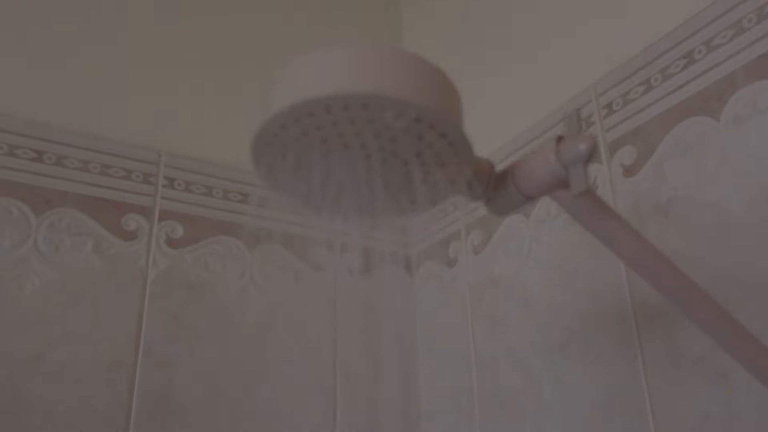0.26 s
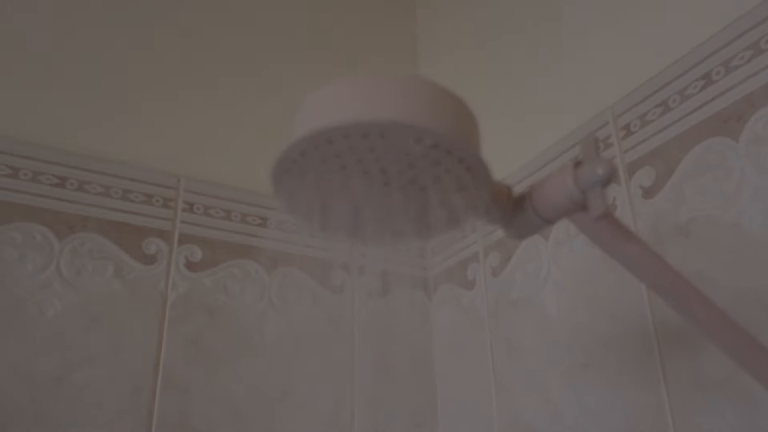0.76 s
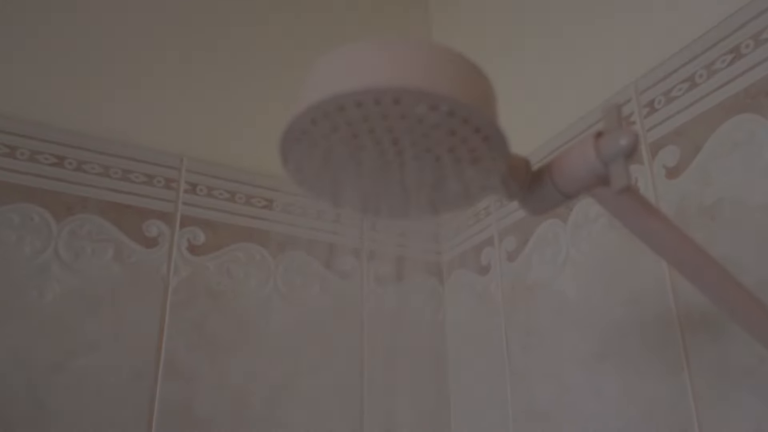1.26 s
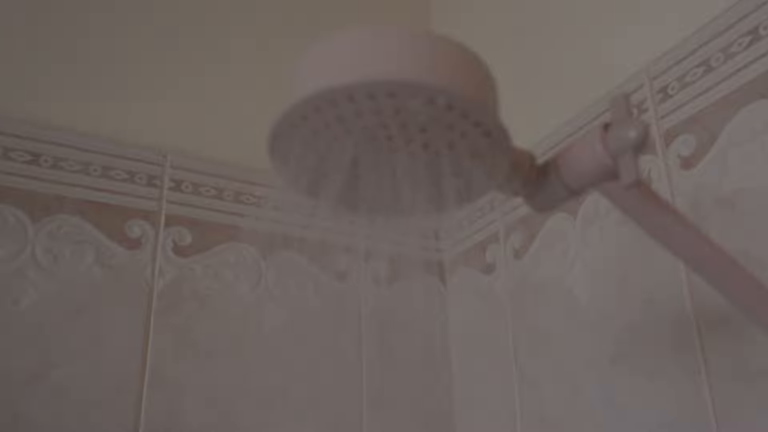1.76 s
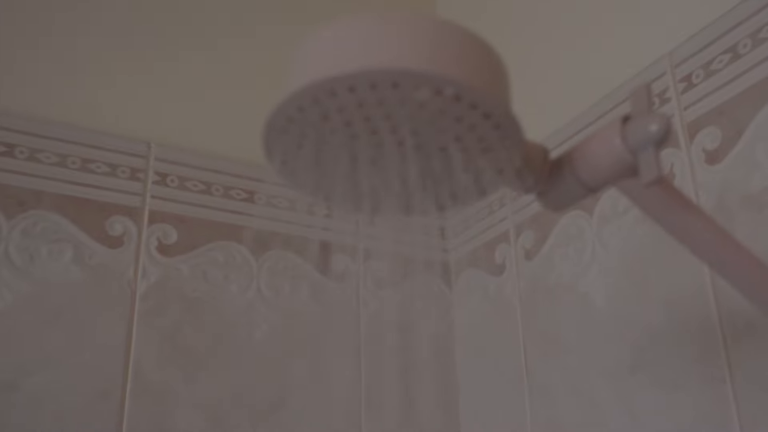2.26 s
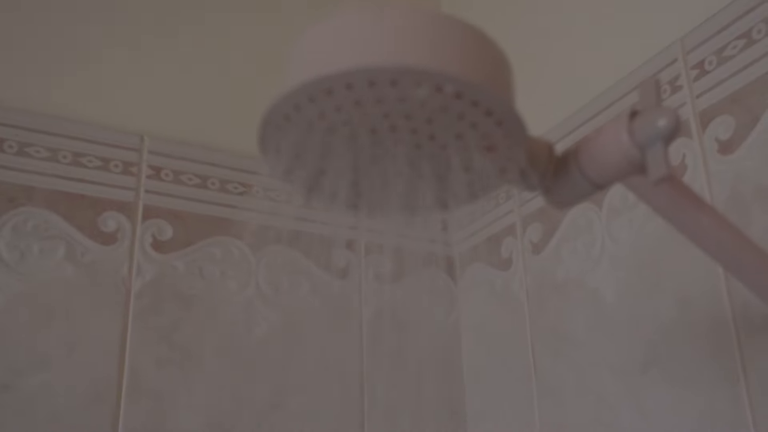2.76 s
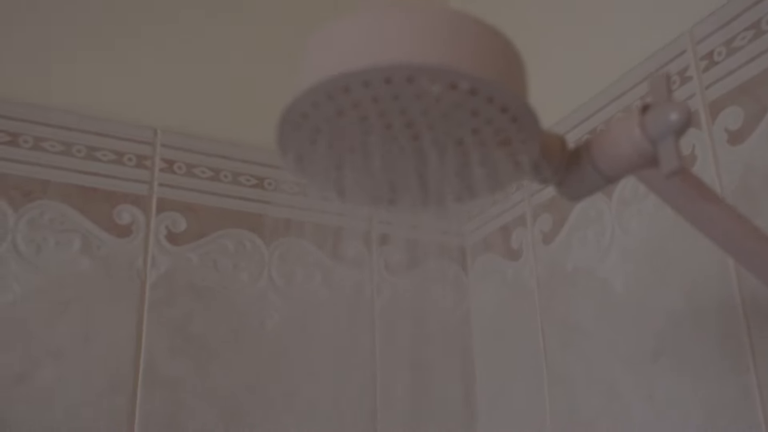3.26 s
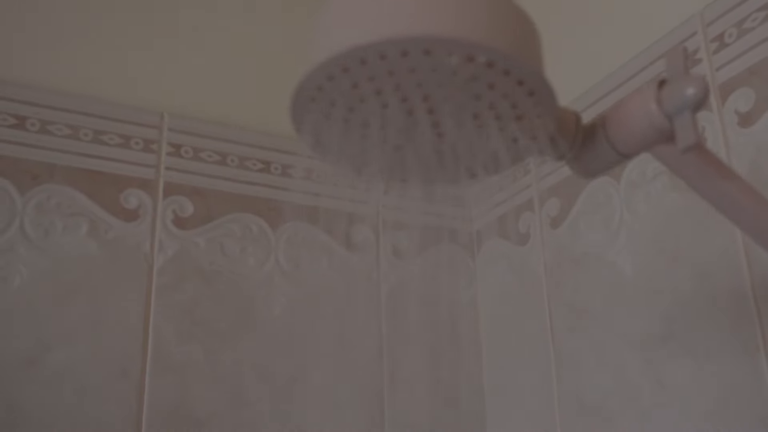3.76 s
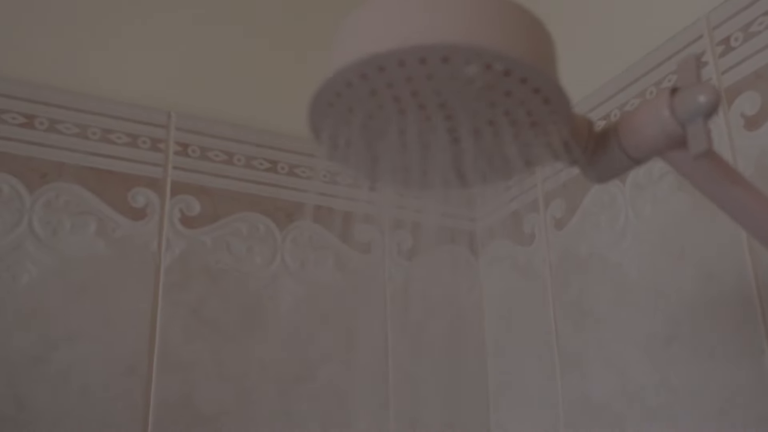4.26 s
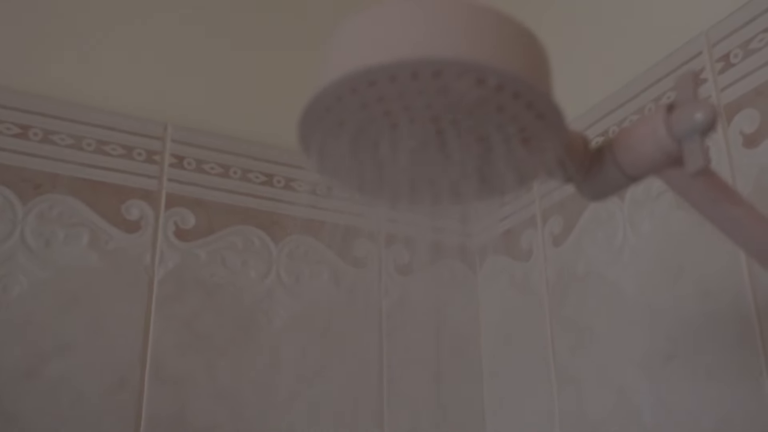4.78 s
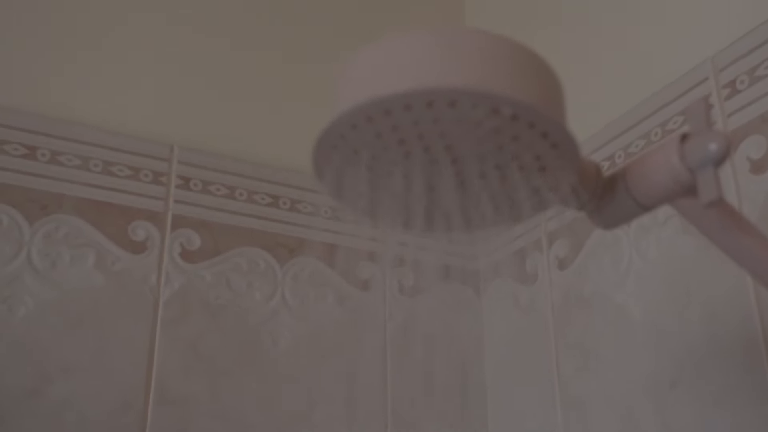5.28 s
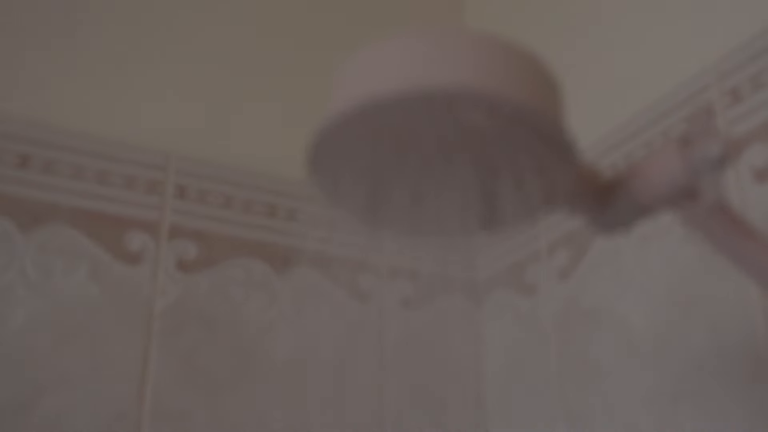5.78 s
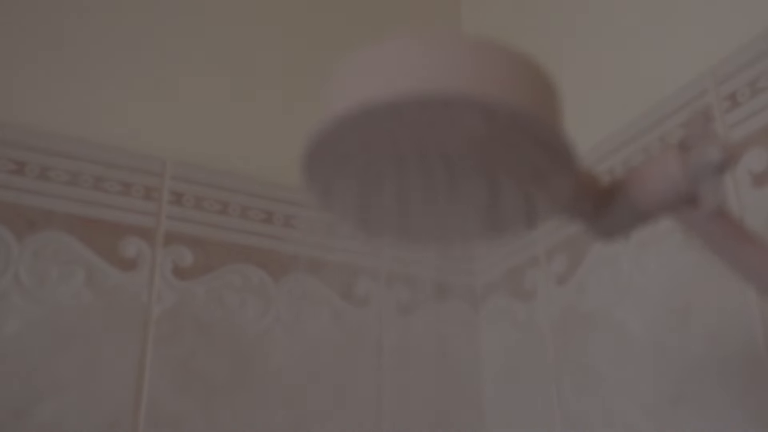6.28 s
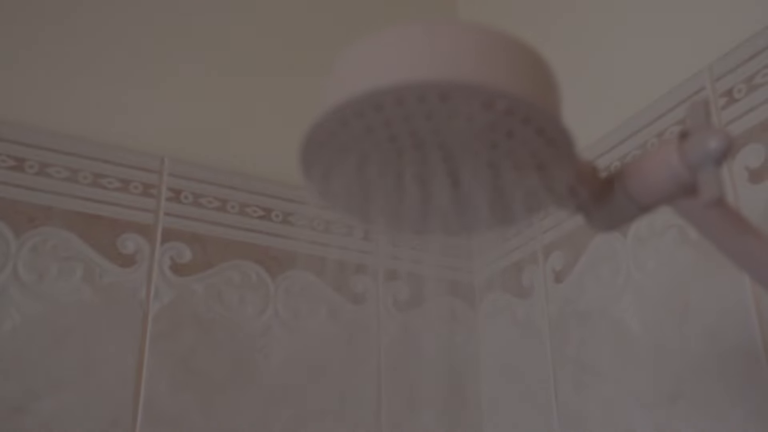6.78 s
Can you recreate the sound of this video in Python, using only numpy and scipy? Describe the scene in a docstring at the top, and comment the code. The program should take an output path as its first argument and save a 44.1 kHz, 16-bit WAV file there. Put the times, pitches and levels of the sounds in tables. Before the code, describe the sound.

A tap handle turns with two small clicks, and at once a shower starts spraying with a steady, bright hiss and wet splashing. Big drops smack the tile nearby, while heavy ones plop into the water below. Faint gurgles and a low wavering hum come and go behind the spray. Something hard clacks once, slightly to the right. The microphones are close to the shower in a tiled bathroom.

```python
"""A tiled bathroom, heard on a close pair of microphones by the shower. The tap turns with two small
clicks, then the spray sets in: countless drops merge into hiss and splash, and big ones smack the tile
nearby. Heavy drops plop into the water below, trapping bubbles that ring on in the room. Behind them
gathered water gurgles on the floor and a low wavering hum near 287 Hz comes and goes.
Something hard clacks once, close by and a little to the right."""
import sys
import numpy as np
from scipy import signal
from scipy.fft import rfft, irfft, next_fast_len
from scipy.io import wavfile
from scipy.ndimage import uniform_filter1d

SR = 44100
rng = np.random.default_rng(int(sys.argv[2]) if len(sys.argv) > 2 else 0)


def digitize_waveform(pressure):
    """Quantize a signal to 16-bit integers and store it at the path in sys.argv[1].

    Rows of a 2-D input are taken as channels; values are limited to [-1, 1].
    """
    field = np.atleast_2d(pressure).T
    bounded = np.clip(field, -1, 1)
    quanta = np.round(bounded * 32767).astype(np.int16)
    wavfile.write(sys.argv[1], SR, quanta)


N = 310023
TIME = np.arange(N) / SR

# heavy drops that trap a bubble:
# (time [s], level [dB], pitch [Hz], echo bandwidth [Hz], bubble against level [dB], early echo t60 [s])
HEAVY_DROPS = [(.355, -42, 940, 200, -4, 0.12), (.943, -35.5, 1633, 150, 10, .12),
               (1.306, -30, 1650, 150, 4, .13), (1.548, -34, 4200, 600, -10, 0.17),
               (1.965, -34, 2520, 300, -1, .16), (2.575, -42, 950, 160, -6, .15),
               (2.611, -33.5, 1638, 190, 6, 0.11), (2.99, -39, 1760, 200, -4, 0.097),
               (3.01, -42.5, 1040, 110, 9, 0.11), (3.112, -39, 3220, 400, -8, .18),
               (3.268, -36.5, 1630, 200, -4, 0.11), (3.469, -37, 2570, 250, -8, .18),
               (3.746, -42, 950, 130, -2, .18), (3.81, -36.5, 947, 150, -2, 0.094),
               (3.981, -33, 1094, 130, 5, 0.088), (4.263, -35.5, 1630, 420, -8, 0.19),
               (4.367, -36.5, 2590, 140, -6, 0.21), (4.451, -27, 990, 190, 10.5, 0.074),
               (4.467, -27, 1018, 150, 19.5, 0.11), (4.479, -28, 2607, 100, 1, 0.11),
               (4.494, -23.5, 1028, 130, 14, 0.059), (4.528, -30, 1420, 700, -6, 0.14),
               (4.531, -35, 2600, 150, 19, 0.065), (4.584, -29.5, 995, 120, 15.5, 0.064),
               (4.817, -35, 1740, 180, -4, .13), (4.863, -33.5, 1045, 120, -11, .26),
               (5.236, -44.5, 1020, 90, -2, 0.17), (5.358, -33.5, 2640, 110, 6, .17),
               (5.411, -40, 985, 130, 1, 0.28), (5.422, -37, 1670, 190, 2, .16),
               (5.575, -31.5, 2590, 150, 8, 0.089), (5.66, -36.5, 1615, 280, -8, 0.24),
               (5.801, -32, 1110, 220, -12, 0.2), (6.046, -31, 2586, 170, 13, 0.076),
               (6.195, -29.5, 2593, 140, 12, 0.16), (6.205, -35, 1690, 240, -8, 0.12),
               (6.334, -33, 2610, 90, -7, .24), (6.465, -38.5, 991, 100, -6, 0.33),
               (6.52, -33, 2620, 170, -4, 0.25), (6.565, -38, 1800, 220, -4, .12),
               (6.59, -38, 1070, 220, -7, .17), (6.725, -32, 1083, 252, -14, 0.23),
               (6.734, -39, 2600, 150, -6, 0.21), (6.778, -37, 1020, 280, -10, 0.1),
               (6.878, -30, 1646, 200, 5, 0.1), (7.008, -34.5, 1097, 120, 11, 0.1)]
BUBBLE_RISE_OCT_PER_S = 0.76  # a bubble's pitch rises as it nears the surface


def gain_of(db):
    """Decibels to a factor."""
    return 10 ** (np.asarray(db) / 20)


def unit_rms(x):
    """Scales to rms 1."""
    return x / np.sqrt(np.mean(x ** 2) + 1e-20)


def at_hz(points, hz):
    """Reads a table on a log-frequency axis."""
    f, value = np.transpose(points)
    return np.interp(np.log(hz + 1), np.log(f + 1), value)


def follow(rows, column=1):
    """One column of a time curve, sample by sample."""
    rows = np.asarray(rows)
    return np.interp(TIME, rows[:, 0], rows[:, column])


def spells(rows, attack_s, release_s):
    """Sums rows of (start, length, height): each rises, holds and dies away."""
    return sum(height * np.clip((TIME - s) / attack_s, 0, 1)
               * np.exp(-np.maximum(TIME - s - length, 0) / release_s) for s, length, height in rows)


def wander(per_s):
    """A random drift of rms 1."""
    knots = np.arange(0, TIME[-1] + 1, 1 / per_s)
    return unit_rms(np.interp(TIME, knots, rng.standard_normal(8192)[:len(knots)]))


def add(mix, s, sound):
    """Mixes a sound into both channels at time s."""
    part = mix[:, max(round(s * SR), 0):][:, :sound.shape[1]]
    part += sound[:, :part.shape[1]]


def colour(x, spectrum):
    """Gives a sound a spectrum, at rms 1."""
    f = np.fft.rfftfreq(x.shape[-1], 1 / SR)
    return unit_rms(irfft(rfft(x) * gain_of(at_hz(spectrum, f)), x.shape[-1]))


def diffuse(pair):
    """Two unrelated signals become what two close microphones hear of a diffuse field."""
    # likeness of left and right: (frequency [Hz], coherence [ratio, capped at 1])
    coherence = [(100, 1.2), (300, 0.86), (600, 0.88), (1200, 0.82), (2500, 0.81), (5000, 0.66),
                 (14000, 0.58)]
    size = next_fast_len(pair.shape[1])
    same = np.clip(at_hz(coherence, np.fft.rfftfreq(size, 1 / SR)), 0, 1)
    mid, side = rfft(pair, size) * np.sqrt([1 + same, 1 - same])
    return irfft(np.array([mid + side, mid - side]), size)


def wash(spectrum, patchy_db):
    """Sound far from the microphones: noise with drifting patches in time and pitch."""
    cells = signal.stft(rng.standard_normal((2, N)), nperseg=512)[2]
    patches = uniform_filter1d(rng.standard_normal(cells.shape[1:]), size=9, axis=0)
    patches = unit_rms(uniform_filter1d(patches, size=9, axis=1))
    noise = signal.istft(cells * gain_of(patchy_db * patches), nperseg=512)[1][:, :N]
    return colour(diffuse(noise), spectrum)[:, :N]


def room(x):
    """The tiled room: a dense tail, shortest in the middle range and longest in the treble."""
    # reverberation: (frequency [Hz], t60 [s])
    decay_times = [(250, 0.54), (1000, 0.077), (4000, 0.26), (14000, 0.94)]
    hz, t, cells = signal.stft(rng.standard_normal((2, SR // 2)), SR, nperseg=256)
    fade = gain_of(-60 * t / at_hz(decay_times, hz)[:, None])
    tail = diffuse(signal.istft(cells * fade, nperseg=256)[1])
    return signal.fftconvolve(x.mean(0)[None], tail / np.linalg.norm(tail[0]), axes=1)[:, :N]


def stall_db(f):
    """The lift that standing waves between the stall's walls give at each frequency."""
    # standing waves: (frequency [Hz], width [Hz], lift [dB])
    modes = [(557, 21, 7), (755, 23, 6), (852, 14, 4.5), (1009, 14, 9.5), (1051, 9.7, 5.5), (1648, 23, 5),
             (1760, 65, 5.5), (1876, 51, -0.5), (2600, 17, 6.5)]
    return sum(db / (1 + (2 * (f - hz) / width) ** 2) for hz, width, db in modes)


def in_stall(x, share=0.77):
    """Colours a steady sound with a share of the standing waves' lift."""
    size = next_fast_len(N)
    lift_db = share * stall_db(np.fft.rfftfreq(size, 1 / SR))
    return irfft(rfft(x, size) * gain_of(lift_db), size)[:, :N]


def burst(hz, octaves, decay_s):
    """One impact: a crack of noise around a centre frequency, first peak near 1."""
    t, f = np.arange(2048) / SR, np.fft.rfftfreq(2048, 1 / SR)
    band = np.exp(-.35 * abs(np.log2((f + 1) / hz) / octaves) ** 3)
    noise = irfft(rfft(diffuse(rng.standard_normal((2, len(t))))) * band)
    shape = t / decay_s * np.exp(1 - 2 * t / decay_s) * 2
    low_cut = signal.butter(2, hz / 4, "highpass", fs=SR, output="sos")  # a small thing radiates no bass
    return 0.72 * unit_rms(signal.sosfilt(low_cut, noise * shape)) * np.sqrt(np.mean(shape ** 2))


def impacts(rows, wet):
    """Sharp hits and the room's answer."""
    out = np.zeros((2, N))
    for s, db, hz, octaves, decay_s in rows:
        add(out, s, gain_of(db) * burst(hz, octaves, decay_s))
    return out + wet * room(out)


def low_hum():
    """In the background a low wavering hum near 287 Hz comes and goes, with a faint rumble under it."""
    # rumble: (frequency [Hz], relative density [dB])
    rumble = [(25, -19), (60, -9), (100, 2), (150, -12), (190, 1), (225, 15), (262, 15), (320, -6),
              (400, -19)]
    # tones of the hum: (frequency [Hz], relative level [dB], waver [Hz])
    tones = [(287.2, -0.5, 3.08), (98, -32, 3.9), (339, -21, 4.5)]
    # spells in which the hum is heard: (start [s], length [s], level [dB])
    hums = [(0.263, 0.097, -55.5), (.45, .1, -58), (.55, 0.3, -55.5), (.89, 0.12, -63),
            (1.053, 0.36, -51.5), (1.495, .036, -58), (1.97, 0.17, -65), (2.165, 0.22, -54),
            (2.43, 0.38, -56.5), (3.53, 0.22, -57.5), (3.725, 0.068, -58), (3.846, 0.15, -59),
            (4.053, 0.22, -64), (4.323, 0.55, -58.5), (4.922, 0.28, -59), (5.402, 0.23, -62),
            (5.96, 0.085, -71), (6.447, 0.35, -67.5)]
    out = gain_of(-17) * wash(rumble, patchy_db=4)
    for hz, db, waver in tones:
        turns = np.cumsum(hz + waver * wander(per_s=25)) / SR
        out += gain_of(db + 2.5 * wander(per_s=32)) * np.sin(2 * np.pi * turns)
    swells = spells([(s, length, gain_of(db)) for s, length, db in hums], attack_s=.028, release_s=.024)
    murmur = gain_of(-67 - 1.24 * TIME + 3.6 * wander(per_s=12))  # between spells, less and less
    return np.hypot(swells, murmur) * out


def valve():
    """Water whispers and faintly whistles in the valve."""
    # whistles: (frequency [Hz], level [dB])
    whistles = [(1385, -68), (3080, -80)]
    # whisper: (frequency [Hz], relative density [dB])
    whisper = [(60, -33), (200, -24), (400, -2), (750, -2), (1100, -10), (1390, 10), (1650, -6), (2600, -8),
               (3050, -1), (3600, -14), (8000, -20), (16000, -27)]
    out = np.zeros(N)
    for hz, db in whistles:
        level = gain_of(db + 1.6 * wander(per_s=77))
        turns = np.cumsum(hz + 11 * wander(per_s=180)) / SR
        out += level * np.sin(2 * np.pi * turns)
    return out + gain_of(-60.5) * wash(whisper, patchy_db=1)


def tap(glide_s=.025):
    """The handle clicks and rings briefly as it is turned."""
    # clicks: (time [s], level [dB], centre [Hz], width [octaves], decay [s])
    clicks = [(.0888, -29, 3600, 0.8, 0.0012), (.0892, -37, 1110, 1.3, 0.00089),
              (.0947, -21.5, 4860, 0.21, 0.00026), (.158, -58, 1300, 1.5, .003)]
    # rings: (time [s], level [dB], pitch [Hz], t60 [s], glide [octaves/s])
    rings = [(.089, -34, 2080, .036, 0), (.089, -31, 2850, .022, 0), (.159, -42, 490, .05, -22),
             (.205, -56, 580, .15, 18)]
    out, t = impacts(clicks, wet=0.061), np.arange(SR // 8) / SR
    for s, db, hz, t60, glide in rings:
        turns = np.cumsum(hz * 2 ** (glide * np.minimum(t, glide_s))) / SR
        envelope = gain_of(db - 60 * t / t60) * (1 - np.exp(-t / 0.00092)) ** 2
        add(out, s, (envelope * np.sin(2 * np.pi * turns))[None])
    return out


def gushes():
    """Gathered water pours on the floor, each time with a hollow gurgle of its own pitch."""
    # pours: (start [s], length [s], level [dB], pitch [Hz])
    pours = [(0.772, 0.074, -50, 535), (2.563, 0.22, -57, 520), (3.26, 0.033, -48.5, 543),
             (3.282, 0.018, -56.5, 395), (3.377, 0.03, -54, 464), (4.318, 0.14, -52, 550),
             (4.871, 0.087, -48, 680), (5.627, 0.19, -54, 505)]
    # gurgle: (frequency [multiple of the pitch], relative density [dB])
    spectrum = [(.12, -47), (.3, -34), (.7, -14.5), (.9, -9.5), (1, 1.5), (1.15, -2.5), (1.5, -8),
                (2.2, -4), (5.5, -42)]
    out = np.zeros((2, N))
    for s, length, db, hz in pours:
        noise = diffuse(rng.standard_normal((2, SR)))
        gurgle = colour(noise, [(k * hz, level) for k, level in spectrum])[:, :SR]
        envelope = spells([(0, length, gain_of(db))], attack_s=0.0059, release_s=0.091)[:SR]
        add(out, s, gurgle * envelope)
    return out


def floor_drumming():
    """The spray drums on the floor, slowly receding, and rings hollow there, most at first."""
    # drumming: (frequency [Hz], relative density [dB])
    drum_spectrum = [(25, -43), (65, -28), (100, -18.5), (135, -33), (165, -26.5), (225, -9), (280, 0),
                     (370, -9), (450, -2), (550, 5.5), (700, 6.5), (1000, 4), (2000, 10), (6000, -64)]
    # hollow ring: (frequency [Hz], relative density [dB])
    hollow_spectrum = [(300, -50), (820, -20), (980, -5.5), (1100, -9.5), (1230, -0.5), (1360, -3.5),
                       (1550, -11), (3000, -44)]
    # course of that ring: (time [s], level [dB])
    hollow_levels = [(.3, -48), (1.45, -47.5), (1.65, -56), (2.8, -51.5), (3.6, -55)]
    drum = gain_of(-51.5 - .5 * TIME) * wash(drum_spectrum, patchy_db=1.3)
    return drum + gain_of(follow(hollow_levels)) * wash(hollow_spectrum, patchy_db=3)


def clack(decay_s=.0012, right_db=3, thump_s=2.478, thump_hz=42):
    """Something hard clacks once near the microphones, a little to the right, with a soft thump."""
    # a light touch, then the blow: (time [s], level [dB])
    contacts = [(2.4775, -11), (2.4805, 0)]
    # modes of the struck thing: (frequency [Hz], level [dB])
    modes = [(1450, -22.5), (1830, -20), (2460, -15.5), (2820, -16), (3290, -21), (3730, -18), (4200, -27)]
    age = np.maximum(TIME - thump_s, 0)
    thump = gain_of(-67) * np.sin(2 * np.pi * thump_hz * age) * np.exp(-age / .012)
    out, t = np.zeros((2, N)), np.arange(1024) / SR
    envelope = t / decay_s * np.exp(1 - t / decay_s)
    ring = envelope * sum(gain_of(db) * np.sin(2 * np.pi * hz * t) for hz, db in modes)
    for s, db in contacts:
        add(out, s, gain_of(db) * ring[None])
    return (out + 0.1 * room(out)) * gain_of([[-right_db / 2], [right_db / 2]]) + thump


def froth(count=7, relative_db=-8.5, scatter_octaves=0.124, delay_s=.045, t60=0.028):
    """Each plop throws off small bubbles, scattered in time and pitch, that roughen it into a gurgle."""
    out, t = np.zeros((2, N)), np.arange(SR // 16) / SR
    for s, db, hz, *_ in HEAVY_DROPS:
        for late, detune, size, pan in rng.standard_normal((count, 4)):
            octaves = scatter_octaves * (0.24 + np.clip(detune, -1.6, 1.6))
            turns = np.cumsum(hz * 2 ** (octaves + BUBBLE_RISE_OCT_PER_S * t)) / SR
            envelope = gain_of(db + relative_db + 2 * size - 60 * t / t60) * (1 - np.exp(-t / 0.0007))
            ring = envelope * np.sin(2 * np.pi * turns)
            add(out, s + delay_s * abs(late), ring * gain_of([[pan], [-pan]]))
    return out


def plops(bubble_share=0.71, swell_share=0.083, early_db=4, late_db=-8, late_t60=0.99, slap_db=-8):
    """A drop slaps the water, its bubble rings briefly upwards, and the room holds that narrow band."""
    out, t, f = np.zeros((2, N)), np.arange(SR // 2) / SR, np.fft.rfftfreq(SR // 2, 1 / SR)
    for s, db, hz, width, bubble_db, t60 in HEAVY_DROPS:
        turns = np.cumsum(hz * 2 ** (BUBBLE_RISE_OCT_PER_S * t)) / SR
        envelope = gain_of(bubble_db - 60 * t / (bubble_share * t60)) * (1 - np.exp(-t / 0.0032)) ** 2
        bubble = envelope * np.sin(2 * np.pi * turns)
        low_cut = np.minimum(f / (0.88 * hz), 1) ** 3
        band = gain_of(stall_db(f)) / (1 + (2 * (f - hz) / width) ** 2) * low_cut
        # the near walls of the stall answer first, then the whole room
        fade = gain_of(early_db - 60 * t / t60) + gain_of(late_db - 60 * t / late_t60)
        fade *= 1 - np.exp(-t / (swell_share * t60))  # a plop that lingers also swells more softly
        mid, side = irfft(np.exp(2j * np.pi * rng.random((2, len(f)))) * band, len(t))
        echo = unit_rms(fade * (mid + 0.31 * np.array([side, -side]))) * np.sqrt(np.mean(fade ** 2))
        add(out, s, gain_of(db) * (bubble + echo))
        add(out, s, gain_of(db + slap_db) * burst(1.4 * hz, octaves=0.28, decay_s=0.017))
    return out


def near_drops():
    """The biggest drops smack the tile close to the microphones."""
    # smacks: (time [s], level [dB], centre [Hz], width [octaves], decay [s])
    smacks = [(.3178, -18, 6500, 1.5, .0014), (.364, -25.5, 4550, .85, .0043),
              (.4105, -23, 8000, 0.46, .0015), (.6393, -19, 7500, .59, 0.0011),
              (.6924, -19, 7400, .7, .0003), (.721, -27, 8000, .75, .0015), (.868, -18, 4400, 0.91, .0016),
              (.932, -23, 3000, .72, .0036), (.9712, -11.5, 9000, 0.76, .0006),
              (1.048, -25.5, 3000, .7, .003), (1.128, -23, 3700, 0.61, 0.0033),
              (1.2162, -17, 9700, .6, .0005), (1.258, -30, 3500, 0.55, 0.0028),
              (1.2738, -13.5, 6000, 1.1, 0.0011), (1.4102, -14, 8800, 0.41, 0.00097),
              (1.547, -22, 3740, 0.38, 0.0075), (1.856, -22, 9500, .9, .0022),
              (1.8724, -15, 9300, 0.58, .0009), (2.0587, -15.5, 10300, 0.5, .0007),
              (2.1575, -15, 9300, 0.55, .0009), (2.5185, -27.5, 3570, 0.14, .0055),
              (2.621, -15, 10500, .6, 0.00088), (2.826, -21.5, 5500, 0.26, 0.0064),
              (2.875, -15, 10000, 1.1, .001), (3.072, -22.5, 3400, 1.1, 0.0043),
              (3.8335, -16.5, 7200, 1, 0.0013), (4.271, -17.5, 9000, 0.9, 0.0052),
              (4.4855, -15, 6500, 0.76, 0.0028), (5.1072, -13.5, 7800, 0.26, 0.0016),
              (5.1568, -17, 9700, .6, 0.0011), (5.4026, -17, 9200, 0.62, .0008),
              (5.6545, -17, 7400, 0.46, 0.002), (5.72, -29, 2900, 0.12, .008),
              (5.775, -29.5, 2780, 0.16, 0.0072), (6.835, -27, 2750, 0.23, 0.0061)]
    return impacts(smacks, wet=0.99)


def spatter(per_s, range_hz, octaves, decay_s, spread_db, wet, count=160):
    """Single drops hit tile at random; spread_db makes a few of them much louder than the rest."""
    out = np.zeros((2, N + 2048))
    kinds = [burst(hz, octaves, decay_s)[:, :512] for hz in np.geomspace(*range_hz, count)]
    for when, kind, size, pan in rng.random((int(per_s * TIME[-1]), 4)):
        size_db = spread_db * min(-np.log(1 - size), 4.2)
        pan_db = (pan - .5) * np.array([[3], [-3]])
        add(out, when * TIME[-1], kinds[int(kind * count)] * gain_of(size_db + pan_db))
    return unit_rms(out[:, :N] + wet * room(out[:, :N]))


def hiss():
    """Fine drops merge into a hiss, which turns harsher as the microphones drift round the jet."""
    # far fine drops: (frequency [Hz], relative density [dB])
    spectrum = [(120, -70), (500, -60), (1500, -19), (3000, -1.5), (5500, 6), (8000, 5.5), (12000, 5),
                (14000, 2.5), (16000, 1)]
    # harshness: (time [s], lift near 5 kHz [dB])
    harshness = [(.3, -7.5), (2.5, -4), (4.5, 0.5), (7, 3)]
    far = wash(spectrum, patchy_db=1.26)
    drops = spatter(per_s=900, range_hz=(6130, 14000), octaves=.79, decay_s=.0036, spread_db=5.5, wet=.4)
    strays = spatter(per_s=21, range_hz=(7000, 11000), octaves=1, decay_s=.0011, spread_db=0, wet=.18)
    fine = gain_of(-2) * far + gain_of(-4.5) * drops + gain_of(-13.5) * strays
    presence = signal.sosfilt(signal.butter(1, [4000, 6500], "bandpass", fs=SR, output="sos"), fine)
    return fine + (gain_of(follow(harshness)) - 1) * presence


def splash():
    """Landing drops make a wet splash, lower in pitch than the hiss."""
    # far splashing: (frequency [Hz], relative density [dB])
    spectrum = [(120, -67), (300, -47), (750, -22), (1050, -5), (1250, 0), (1480, -7.5), (2000, -1),
                (2800, -1), (4200, -1.5), (6500, -2), (12000, -16.5)]
    far = wash(spectrum, patchy_db=3)
    drops = spatter(per_s=490, range_hz=(2290, 5460), octaves=.28, decay_s=.0036, spread_db=3, wet=1)
    return gain_of(-1.5) * far + gain_of(-5.5) * drops


def spray(attack_s=0.0071, release_s=0.016):
    """The shower's jets: hiss and splash swell and ebb above the drumming on the floor."""
    # course of the spray: (time [s], hiss gain [dB], splash gain [dB])
    flow = [(.3, -30.5, -35.5), (.55, -31, -36), (1.25, -30, -33.5), (1.72, -30.5, -37.5), (2.08, -30, -34),
            (2.43, -32.5, -37), (2.85, -28.5, -35.5), (3.75, -30, -36), (4.45, -30.5, -35.5),
            (4.73, -30, -39), (4.95, -28, -36), (5.55, -31, -34.5), (6, -29.5, -35.5), (7.02, -30, -33)]
    # the jets swing closer for a moment: (start [s], length [s], hiss lift [dB], splash lift [dB])
    surges = [(0.708, 0.035, 3.5, 2.5), (1.137, 0.033, 4, -0.5), (1.394, 0.061, 4, 1.5),
              (1.845, 0.074, 6, 1.5), (1.933, 0.036, 0.5, 4.5), (2.145, 0.14, 4.5, -2.5),
              (2.614, 0.026, 4, -12), (2.815, 0.075, -3, 4), (4.263, 0.051, 0.5, -2), (4.474, 0.12, 1.5, 5),
              (5.06, 0.11, 1.5, -0.5), (5.398, 0.089, 1.5, 0.5), (5.665, 0.14, 3, 2)]
    hiss_lift = spells([(s, length, db) for s, length, db, _ in surges], attack_s, release_s)
    splash_lift = spells([(s, length, db) for s, length, _, db in surges], attack_s, release_s)
    flutter = gain_of(0.65 * wander(per_s=30))  # the jets break up unevenly
    hiss_gain = flutter * gain_of(follow(flow) + hiss_lift)
    splash_gain = flutter * gain_of(follow(flow, column=2) + splash_lift)
    return hiss_gain * hiss() + in_stall(splash_gain * splash() + floor_drumming())


def scene(spray_on_s=.256, tap_fade_s=0.054, spray_rise_s=0.018):
    """Tap and valve fade out just before the running shower sets in."""
    before = np.clip((spray_on_s - TIME) / tap_fade_s, 0, 1)
    running = np.clip((TIME - spray_on_s) / spray_rise_s, 0, 1)
    opening = tap() + valve()
    shower = spray() + gushes() + low_hum() + plops() + froth() + near_drops() + clack()
    return before * opening + running * shower


def record(dry, cutoff_hz=15780):
    """The two microphones differ slightly in colour, and the top of the treble is cut off."""
    # balance of the pair: (frequency [Hz], left minus right [dB])
    balance = [(200, 0.14), (600, -0.28), (3000, -0.81), (8000, -1), (13000, 1)]
    size = next_fast_len(N)
    lean_db = at_hz(balance, np.fft.rfftfreq(size, 1 / SR)) / 2
    heard = irfft(rfft(dry, size) * gain_of([lean_db, -lean_db]), size)[:, :N]
    lowpass = signal.firwin(511, cutoff_hz, window=("kaiser", 9), fs=SR)
    return signal.oaconvolve(heard, lowpass[None], "same")


dry = scene()
out = record(dry)
digitize_waveform(out)
```